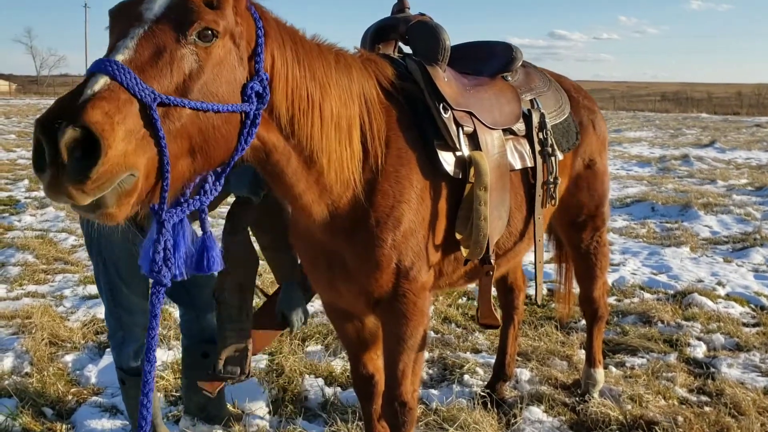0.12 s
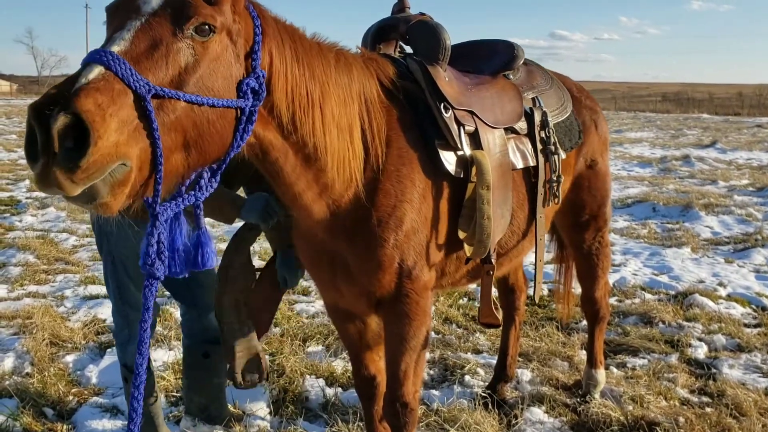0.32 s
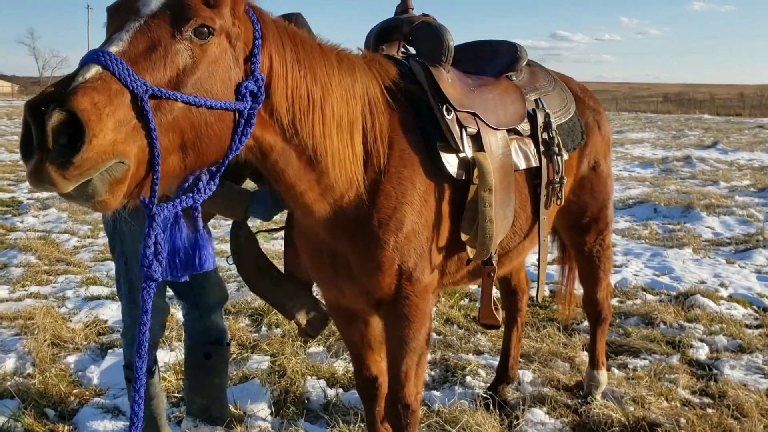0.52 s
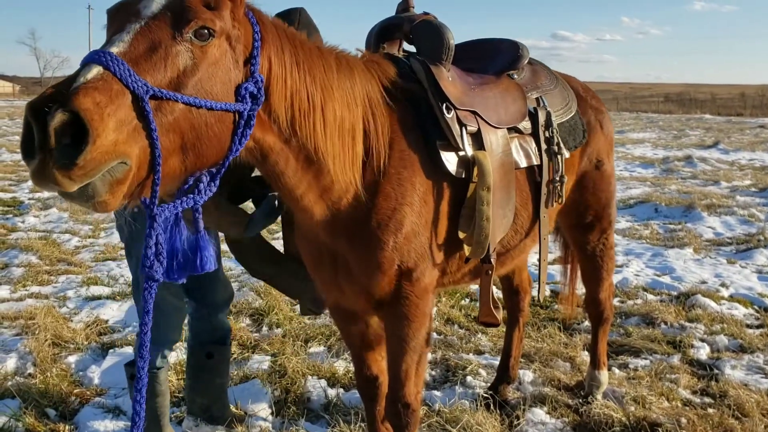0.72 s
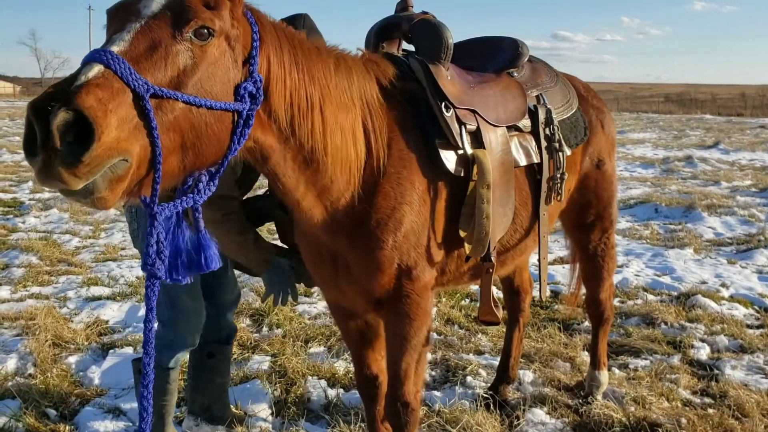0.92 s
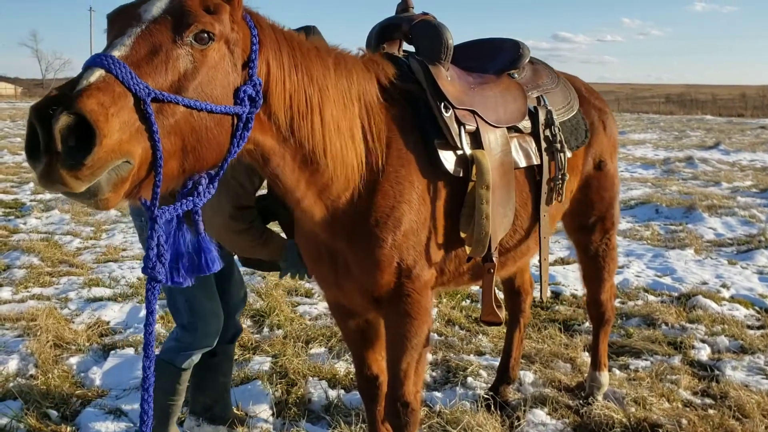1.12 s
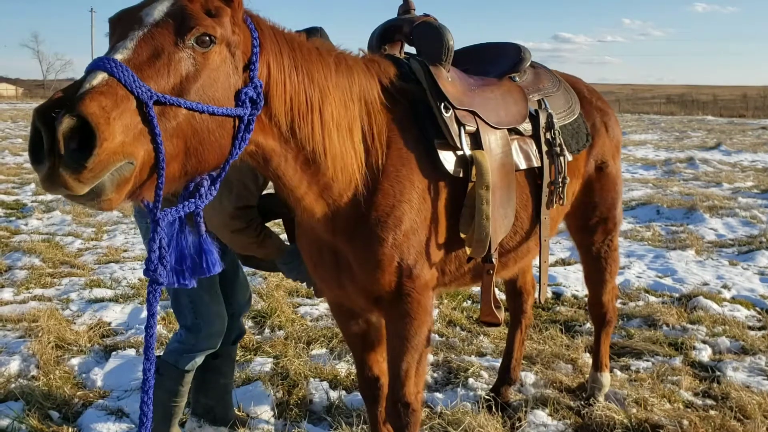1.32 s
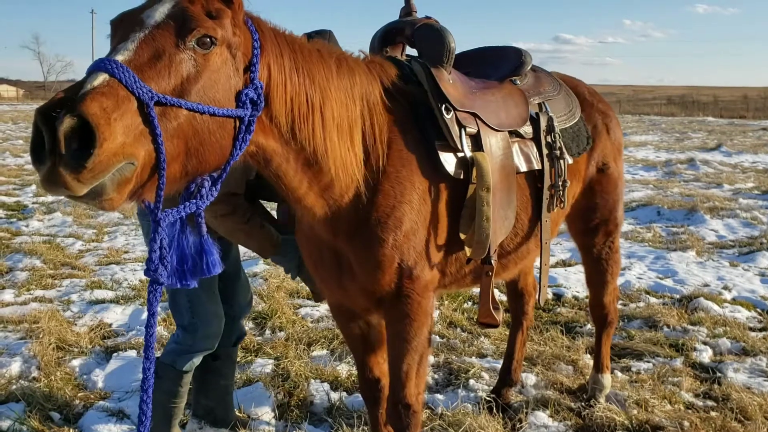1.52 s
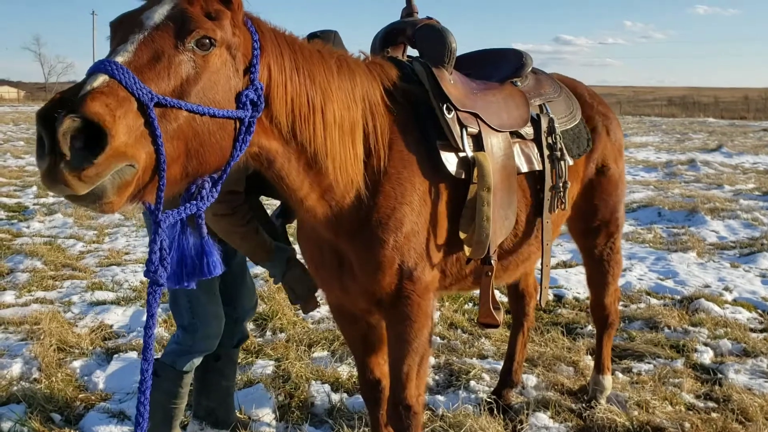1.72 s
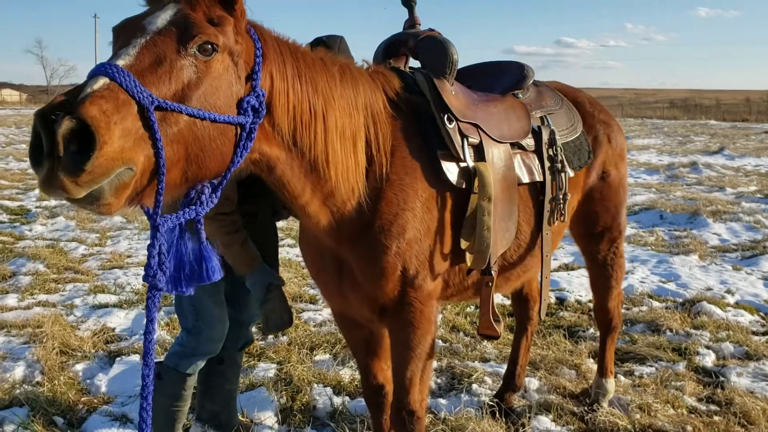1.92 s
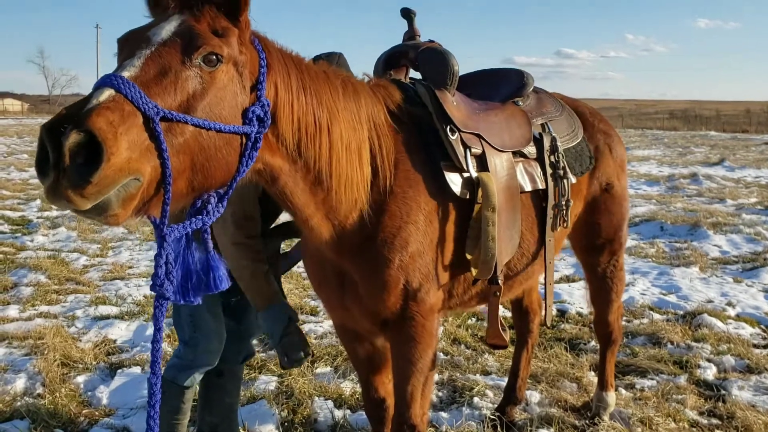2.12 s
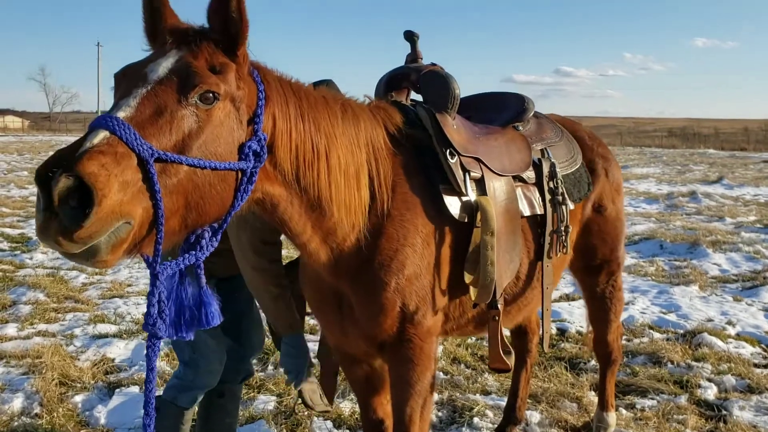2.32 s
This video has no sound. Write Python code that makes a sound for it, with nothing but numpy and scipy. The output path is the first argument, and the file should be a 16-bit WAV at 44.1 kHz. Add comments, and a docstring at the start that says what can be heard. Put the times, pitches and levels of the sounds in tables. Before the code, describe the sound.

A horse nickers close to the microphone, slightly left, in a quiet open field. About ten quick, rough nasal squeals sink into fluttering throaty grunts, ending with wet lip smacks and nostril breaths over a faint breeze.

```python
"""A still, snowy field; a horse nickers close by, a little left of a two-port microphone.
Ten quick pushes of air go through its nose: a thin whistle slides down, a rough squeal rings in the
nasal passages, and the pitch collapses into the grunt of a slack, flapping throat. The run gets lower
and throatier, with draughts through the nostrils, wet lip smacks and throat knocks in between.
Soft puffs of air hit the microphone, and a faint breeze lies behind it all."""
import sys
import numpy as np
from scipy.fft import rfft, irfft, next_fast_len
from scipy.io import wavfile
from scipy.ndimage import map_coordinates

SR = 44100
rng = np.random.default_rng(int(sys.argv[2]) if len(sys.argv) > 2 else 0)


def generate_wav(signal):
    """Clip the signal to [-1, 1] and save it as 16-bit WAV at the path in sys.argv[1]."""
    frames = np.transpose(np.atleast_2d(signal))
    scaled = np.clip(frames, -1, 1) * 32767
    pcm = np.round(scaled).astype(np.int16)
    wavfile.write(sys.argv[1], SR, pcm)


N = 108045
T = np.arange(N) / SR

# breeze over open ground: f/Hz, level/dB
BREEZE_SPECTRUM = [(25, -5.5), (75, 12), (120, 2), (250, -16.5), (600, -23), (2500, -25.5), (8000, -43.5),
                   (15500, -39)]
# puffs of air on the microphone: t/s, level/dB
BUFFETS = [(.39, -35.5), (.5, -46.5), (1.31, -41), (1.49, -54), (1.675, -39), (2.03, -34.5)]
# course of the opening whine: t/s, f/Hz, level/dB
WHINE_PATH = [(0, 524, -47), (0.069, 530, -64), (0.114, 570, -36.5), (0.139, 512, -38.5), (0.189, 596, -40),
              (0.231, 606, -41)]
# resonances of the nasal passages: f/Hz, width/Hz, level/dB
NASAL_MODES = [(315, 246, -9), (644, 250, -5.5), (1105, 337, -3), (1747, 214, 3), (2132, 160, 3),
               (2390, 253, -2.5), (3020, 205, -14.5), (3646, 250, -7), (4130, 220, -16.5), (4730, 230, -17),
               (5685, 350, -17.5), (6400, 330, -23.5), (6860, 570, -26.5)]
# steady draughts through the nostrils: start/s, end/s, level/dB
DRAUGHTS = [(0, .085, -51.5), (0.107, 0.337, -43), (1.774, 1.877, -43), (1.974, 2.049, -37.5),
            (2.145, 2.15, -36.5), (2.288, 2.408, -46.5)]
# colour of a draught: f/Hz, level/dB
DRAUGHT_SPECTRUM = [(100, -4), (220, 5.5), (450, -9), (750, 3.5), (1350, 3), (1650, 5), (2000, 3.5),
                    (2450, -1.5), (2850, 3.5), (3700, -1.5), (7000, -5.5), (8200, -19), (9500, -7.5),
                    (15500, -7)]
# short nostril whistles: t/s, half-width/s, f/Hz, level/dB
PEEPS = [(0.025, 0.023, 1610, -40), (0.114, 0.013, 1094, -41), (0.146, 0.019, 1035, -38.5),
         (0.196, 0.028, 1197, -36.5)]
# pushes of air: pitch collapse t/s, hold before it/s, squeal/dB, top f/Hz, noise share (capped in use),
# tilt/(dB/octave), hiss/dB, whistle/dB
PUSHES = [(0.284, 0.038, -21.5, 609, 0.47, 1, -31.5, -42), (0.433, 0.049, -20, 622, 0.8, 1.5, -31.5, -66),
          (.590, 0.032, -16.5, 638.7, 0.49, 3, -31.5, -39.5),
          (.750, 0.031, -16.5, 627.5, 0.35, 3, -31.5, -40), (.920, 0.038, -17.5, 620, 0.37, 3, -33, -36),
          (1.083, 0.026, -16, 616.3, 0.45, 3, -34, -38), (1.259, 0.023, -19.5, 558, 0.57, 0, -32, -40.5),
          (1.434, 0.014, -18.5, 542.3, 0.64, -1, -32, -47),
          (1.612, 0.0085, -18, 499.5, 0.74, -2.5, -32, -48),
          (2.134, 0.027, -22.5, 478, 0.97, -1.5, -33, -36.5)]
# colour of the nostril hiss: f/Hz, level/dB
HISS_SPECTRUM = [(100, -75), (500, 5), (2400, 0.5), (2800, 1), (3600, 4.5), (4300, -4), (4900, 0),
                 (7200, 3.5), (7900, -13), (8800, -14.5), (9300, 1.5), (11000, -10), (12500, 5),
                 (15500, -4.5)]
# nasal rings that sink in each squeal: first f/Hz, last f/Hz, level/dB
NASAL_RINGS = [(1844, 1660, -3), (2478, 2080, 1), (3670, 3560, -11)]
# grunts: t/s, length/s, level/dB, first f/Hz, slide time/s
GRUNTS = [(.400, 0.04, -26.5, 559, 0.055), (0.567, 0.044, -26, 530, 0.042),
          (0.723, 0.069, -25.5, 480, 0.038), (0.903, 0.061, -21, 460, 0.025),
          (1.069, .092, -18.5, 450, 0.016), (1.239, 0.11, -17.5, 433, 0.018),
          (1.413, .122, -19, 441.4, 0.02015), (1.594, 0.051, -20, 420, 0.017),
          (1.933, 0.037, -19.5, 166.4, 0.012), (2.111, 0.05, -19, 413.6, 0.01935)]
# wet lip smacks: t/s, level/dB
LIP_SMACKS = [(0.801, -32), (1.864, -39), (1.935, -26), (1.992, -43), (2.013, -26.5), (2.389, -41.5)]
# throat knocks: t/s, low ring/dB, nasal puff/dB, puff tilt/(dB/octave)
THROAT_KNOCKS = [(1.316, -39, -38, 13), (1.484, -22, -28, 7), (1.664, -22, -31.5, 12.5),
                 (1.861, -27.5, -29.5, 1.5), (1.993, -22.5, -20.5, 6.5), (2.015, -19, -28, 0),
                 (2.03, -13.5, -20, -4), (2.044, -20, -38, 4), (2.391, -29, -32, -4)]
# lead of the left port over the right: f/Hz, phase/rad
PORT_LEAD = [(0, 0), (500, 1.1), (850, 1.23), (1500, 3), (1800, 3.5), (2200, 5.5), (2600, 8.5), (3600, 8.5),
             (5000, 12), (7000, 18), (16000, 33)]
# left port against right: f/Hz, level/dB
PORT_BALANCE = [(60, 4), (300, -0.1), (650, 3.5), (1150, -0.5), (1650, 10), (2050, -4.5), (2450, 0),
                (4200, -1.5), (6500, 3), (9500, -0.5), (13000, 4.5), (15500, 12)]
# likeness of noise at the two ports: f/Hz, correlation
PORT_LIKENESS = [(100, 0.88), (2400, 0.97), (4500, 0.63), (15000, 0.64)]

THROAT_HZ, CHEST_HZ = 166.8, 54  # where the voice comes to rest; the shake of the chest


def amp(db):
    """Decibels to gain."""
    return 10 ** (np.asarray(db) / 20)


def unit(x):
    """x at rms 1."""
    return x / np.sqrt(np.mean(x ** 2) + 1e-20)


def along(points, hz):
    """Read a table of f/Hz, value on a log frequency axis."""
    freqs, values = np.transpose(points)
    return np.interp(np.log(hz + 1), np.log(freqs + 1), values)


def wobble(rate):
    """A smooth random curve, rate knots a second."""
    return map_coordinates(rng.standard_normal(N // 8), [T * rate], mode="wrap")


def filtered(x, response):
    """Shape x by a response that is a function of frequency."""
    size = next_fast_len(N + 8192, True)
    return irfft(rfft(x, size) * response(np.fft.rfftfreq(size, 1 / SR)), size)[..., :N]


def noise(gain):
    """Two-port noise of rms 1, coloured by gain(hz) and less alike in the treble."""
    def mid_and_side(hz):
        angle = np.arccos(np.clip(along(PORT_LIKENESS, hz), 0, 1)) / 2
        return gain(hz) * [np.cos(angle), np.sin(angle)]
    mid, side = filtered(rng.standard_normal((2, N)), mid_and_side)
    return unit(np.array([mid + side, mid - side]))


def swell(start, end, rise_db_s, fall_db_s):
    """Gain that rises until start, holds until end and dies away."""
    return amp(-rise_db_s * np.maximum(start - T, 0) - fall_db_s * np.maximum(T - end, 0))


def burst(at, attack_s, decay_s):
    """A quick rise and an exponential decay."""
    age = np.maximum(T - at, 0)
    return (1 - np.exp(-(age / attack_s) ** 2)) * np.exp(-np.maximum(age - attack_s, 0) / decay_s)


def bump(at, width_s):
    """A bell-shaped envelope."""
    return np.exp(-((T - at) / width_s) ** 2)


def step(at, edge_s):
    """A smooth step in time from 0 to 1."""
    return .5 + .5 * np.tanh((T - at) / edge_s / 2)


def unsteady_phase(hz, jitter, rate):
    """Phase of a vibration whose pitch wavers by the fraction jitter."""
    return 2 * np.pi * np.cumsum(hz * (1 + jitter * wobble(rate))) / SR


def nose(hz, tilt_db=0):
    """Gain of the nasal passages, tilted by tilt_db an octave around 2 kHz."""
    power = sum((amp(db) / (1 + (2 * (hz - centre) / width) ** 2)) ** 2
                for centre, width, db in NASAL_MODES)
    return np.sqrt(power) * amp(tilt_db * np.log2(np.clip(hz, 400, 4000) / 2000))


def voice(pitch, tilt_db, jitter, gain):
    """Twelve harmonics slide through the nasal resonances, with the total energy of gain."""
    phase = unsteady_phase(pitch, jitter, rate=500)
    on = gain > gain.max() / 1000
    k = np.arange(1, 13)[:, None]
    harmonics = np.sin(k * phase[on] + rng.uniform(0, 2 * np.pi, k.shape))
    tone = np.zeros(N)
    tone[on] = np.sum(nose(k * pitch[on], tilt_db) * harmonics, 0) * gain[on]
    return tone * np.sqrt(np.sum(gain ** 2) / np.sum(tone ** 2))


def breeze():
    """Faint, low wind over open ground."""
    return amp(-55 + .61 * wobble(8.46)) * noise(lambda hz: amp(along(BREEZE_SPECTRUM, hz)))


def whine():
    """A soft voiced whine through the nose opens the run."""
    times, hz, db = np.transpose(WHINE_PATH)
    gain = amp(np.interp(T, times, db, right=-140) + 1.6 * wobble(122))
    return voice(np.interp(T, times, hz), tilt_db=5, jitter=.023, gain=gain)


def draughts():
    """Air streams through the nostrils before the run and around its last push."""
    flow = sum(amp(db) * swell(start, end, rise_db_s=354, fall_db_s=612) for start, end, db in DRAUGHTS)
    return flow * amp(2.4 * wobble(90)) * noise(lambda hz: amp(along(DRAUGHT_SPECTRUM, hz)))


def peeps():
    """The nostrils whistle briefly before the first push."""
    return sum(amp(db) * bump(at, width_s) * np.sin(unsteady_phase(hz, jitter=.036, rate=290))
               for at, width_s, hz, db in PEEPS)


def nostril_opening(at, hold):
    """The nostrils open 60 ms ahead of a push's hold."""
    return step(at - hold - .06, edge_s=.007)


def whistles(centre_hz=863, lead_s=.066, slide_s=.065):
    """A thin falling whistle leads into each squeal."""
    out = np.zeros(N)
    for at, *_, db in PUSHES:
        peak = at - lead_s
        pitch = centre_hz * np.exp(-np.clip((T - peak) / slide_s, -1, 2))
        out += amp(db) * bump(peak, width_s=.03) * np.sin(unsteady_phase(pitch, jitter=.0537, rate=330))
    return out


def hiss_and_smacks():
    """Air hisses in the nostrils with each push; the lips smack in short bursts of the same colour."""
    pushes = sum(amp(db) * nostril_opening(at, hold)
                 * swell(at - hold, at - .004, rise_db_s=314, fall_db_s=329)
                 for at, hold, *_, db, _ in PUSHES)
    smacks = sum(amp(db) * burst(at, attack_s=.0012, decay_s=.0081) for at, db in LIP_SMACKS)
    flicker = amp(2.25 * wobble(220))
    return (pushes + smacks) * flicker * noise(lambda hz: amp(along(HISS_SPECTRUM, hz)))


def squeals():
    """Each push drives a rough, fluttering squeal whose pitch scoops up, then collapses."""
    out = np.zeros((2, N))
    for at, hold, db, top_hz, noise_share, tilt_db, _, _ in PUSHES:
        scoop = .75 + .25 * step(at - .074, edge_s=.00914)
        held = 1 - step(at + .01, edge_s=.014)
        pitch = THROAT_HZ + (top_hz * scoop - THROAT_HZ) * held
        gain = swell(at - hold, at - .011, rise_db_s=400, fall_db_s=523) * nostril_opening(at, hold)
        noise_share = min(noise_share, .7)
        tone = amp(-2) * voice(pitch, tilt_db, jitter=.011, gain=gain)
        tone += (1 - noise_share) * gain * nasal_rings(at)
        breath = gain * noise(lambda hz: nose(hz, tilt_db))
        level = amp(db + 1.3 * wobble(330))
        out += level * (np.sqrt(1 - noise_share) * tone + np.sqrt(noise_share) * breath)
    return out


def nasal_rings(at):
    """Narrow nasal rings catch once the push is strong and slide down as it runs out."""
    sunk = step(at - .0202, edge_s=.00855)
    tones = sum(amp(db) * np.sin(unsteady_phase(first + (last - first) * sunk, jitter=.0197, rate=600))
                for first, last, db in NASAL_RINGS)
    return tones * step(at - .058, edge_s=.0044)


def buffets(rumble_hz=75):
    """Soft puffs of air rumble on the microphone ports."""
    puffs = sum(amp(db) * bump(at, width_s=.018) for at, db in BUFFETS)
    return puffs * noise(lambda hz: (hz / rumble_hz) ** 2 / (1 + (hz / rumble_hz) ** 6))


def grunts(flap_hz=58, flap_db=4.5, swell_s=.038, sag_db_s=103):
    """The slack throat hums and flaps unevenly, letting out rasp and hiss while the chest shakes."""
    hum, effort = np.zeros(N), np.zeros(N)
    flaps = amp(flap_db * np.sin(unsteady_phase(flap_hz, jitter=.271, rate=120)))
    for at, length, db, first_hz, slide_s in GRUNTS:
        pitch = THROAT_HZ + (first_hz - THROAT_HZ) * np.exp(-np.maximum((T - at) / slide_s, -.5))
        gain = amp(db - sag_db_s * np.maximum(T - at - swell_s, 0))
        gain *= swell(at + swell_s, at + length, rise_db_s=427, fall_db_s=814)
        gain *= step(at - .008, edge_s=.002)
        phase = unsteady_phase(pitch, jitter=.06, rate=200)
        taut = np.clip(pitch / THROAT_HZ - .8, 0, 1)  # a tauter throat is brighter and rougher
        overtones = amp(1.5) * sum(nose(k * pitch) * np.sin(k * phase) for k in (2, 3))
        growl = amp(-5) * unit(wobble(380)) * np.sin(phase)
        hum += gain * (np.sin(phase) + taut * (overtones + growl))
        effort += gain
    rasp = amp(-23) * flaps * noise(lambda hz: nose(hz, tilt_db=-4))
    hiss = amp(-20.5) * noise(lambda hz: amp(along(HISS_SPECTRUM, hz)))
    chest = amp(-40.5) * np.sin(unsteady_phase(CHEST_HZ, jitter=.265, rate=60))
    return flaps * (hum + effort * rasp) + effort * (chest + hiss)


def knocks():
    """Single flaps of the throat: a low ring, a chest thump and a puff through the nose."""
    out = np.zeros((2, N))
    for at, ring_db, puff_db, tilt_db in THROAT_KNOCKS:
        turn = 2 * np.pi * (T - at)
        ring = np.sin(THROAT_HZ * turn) + amp(-9) * np.sin(CHEST_HZ * turn)
        puff = noise(lambda hz: nose(hz, tilt_db))
        out += amp(ring_db) * burst(at, attack_s=.0021, decay_s=.0098) * ring
        out += amp(puff_db) * burst(at, attack_s=.0014, decay_s=.0069) * puff
    return out


def scene():
    """The muzzle is close and to the left, so its sound reaches the left port first."""
    def ports(hz):
        half = np.array([[.5], [-.5]])
        lead = np.interp(hz, *np.transpose(PORT_LEAD))
        return amp(half * along(PORT_BALANCE, hz)) * np.exp(1j * half * lead)
    horse = squeals() + whistles() + peeps() + whine() + grunts() + knocks()
    horse += hiss_and_smacks() + draughts()
    return filtered(horse, ports) + buffets() + breeze()


def record(dry, top_hz=15800):
    """The recorder cuts off steeply at its band limit."""
    return filtered(dry, lambda hz: 1 / (1 + (hz / top_hz) ** 300))


dry = scene()
out = record(dry)
generate_wav(out)
```